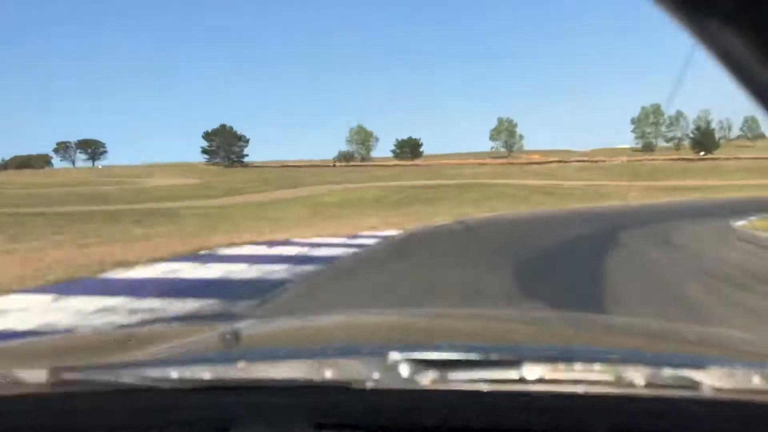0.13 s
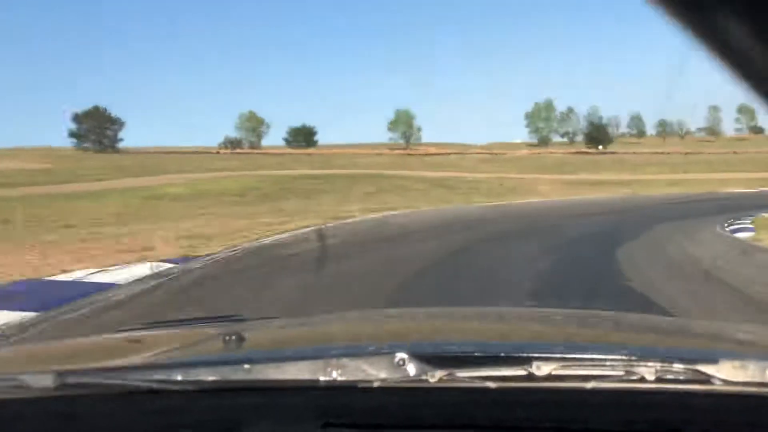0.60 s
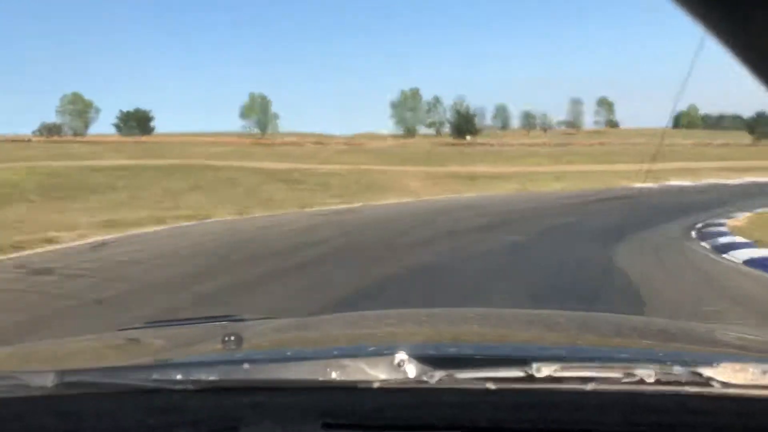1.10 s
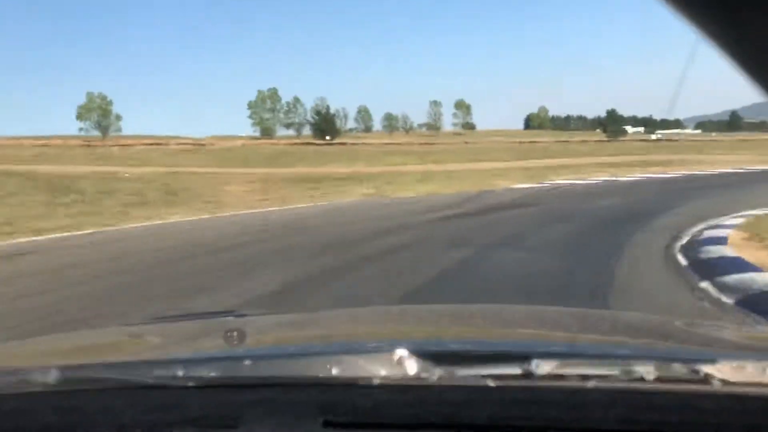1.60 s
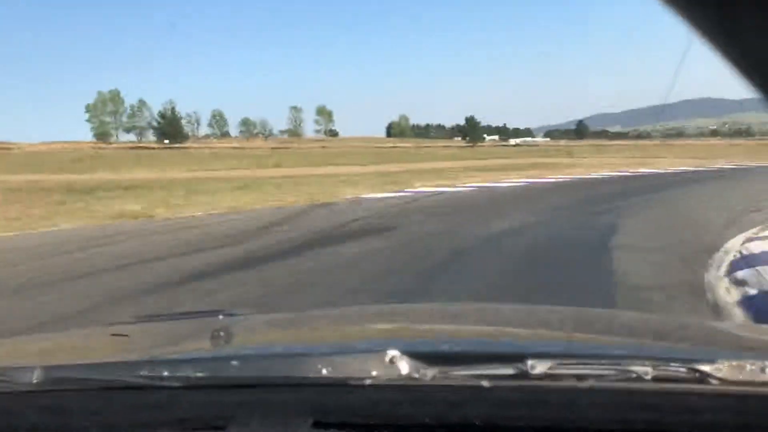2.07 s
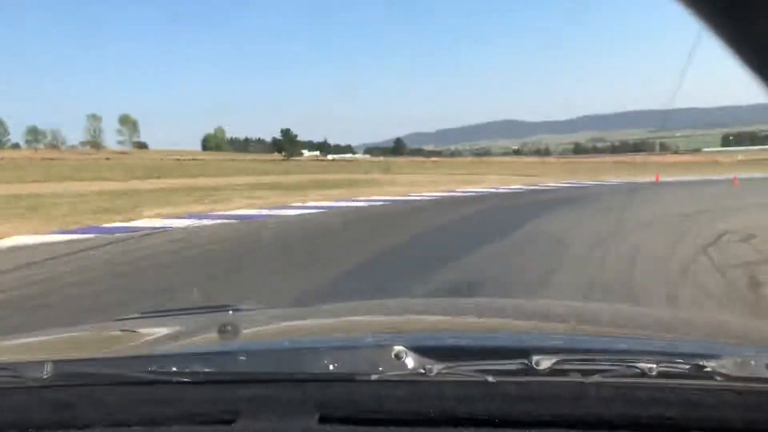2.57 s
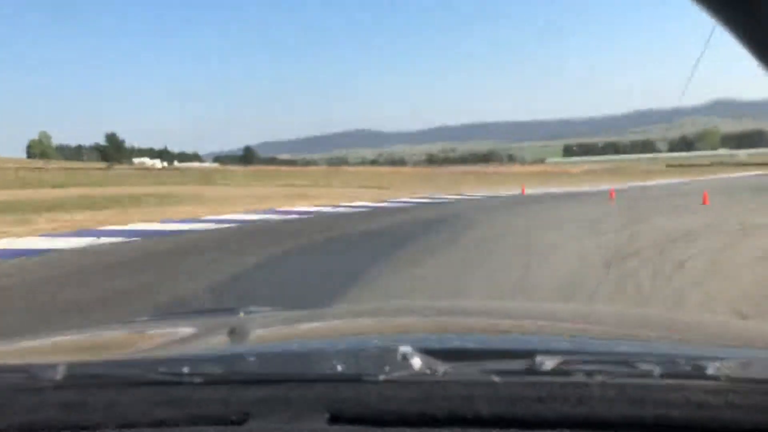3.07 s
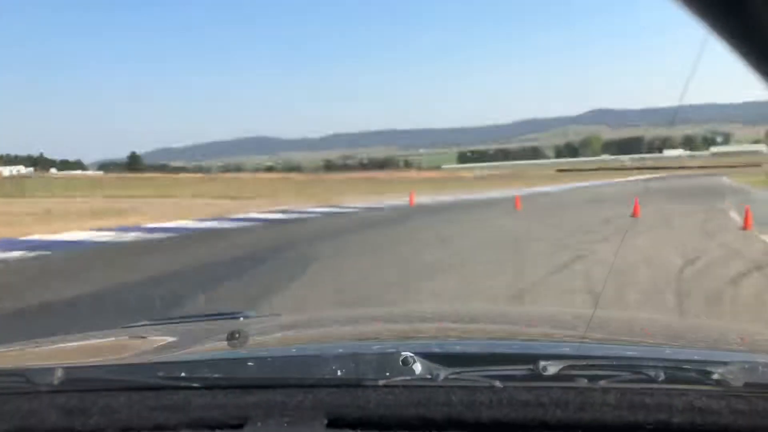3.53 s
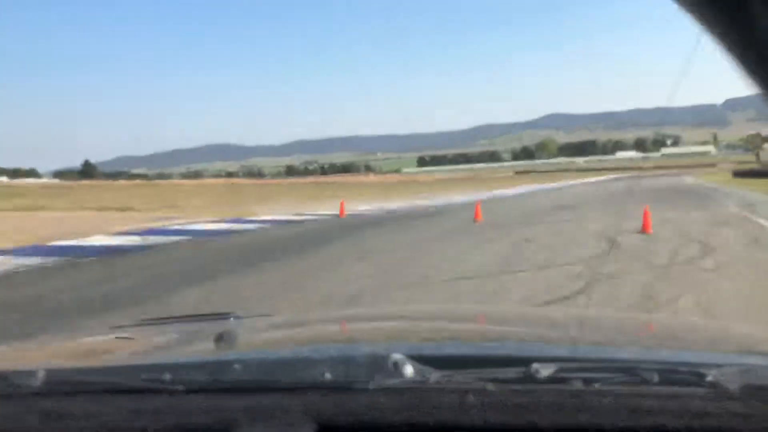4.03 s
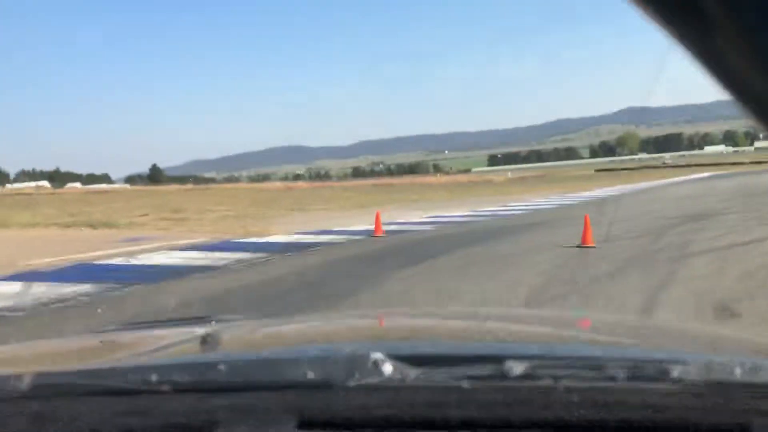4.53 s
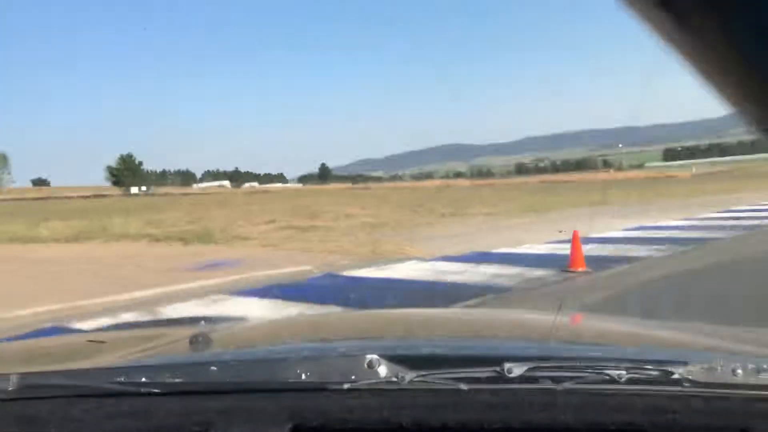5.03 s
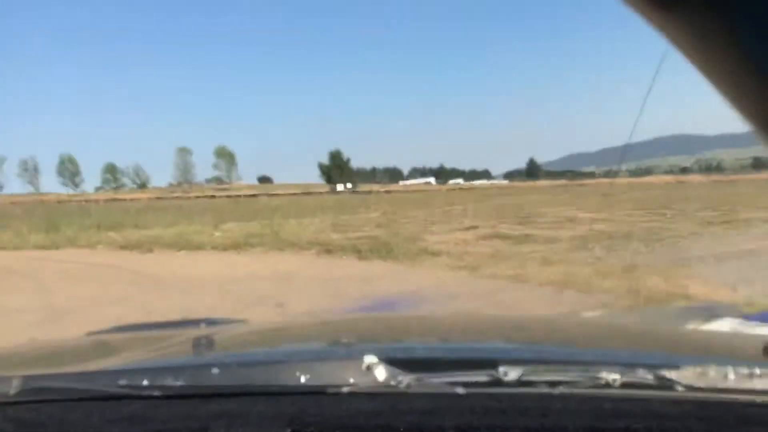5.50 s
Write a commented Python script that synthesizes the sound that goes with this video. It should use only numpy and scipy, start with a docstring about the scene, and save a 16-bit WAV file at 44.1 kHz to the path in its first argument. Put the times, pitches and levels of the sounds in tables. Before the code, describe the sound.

Car cabin on a circuit: engine drone sinking, one quick downshift blip, then sinking again, with rumbling tyres and a rattling camera mount.

```python
"""Inside a car slowing through corners: the engine's low orders, unsteady sines, hum over road roar of coloured
noise that the cabin booms with, and a metal clip jingles as each firing shakes it. Trim knocks, noise bursts
through panel resonances, come now and then from 0.7 s. From 1.9 s a loose camera mount buzzes in short bouts
of impulses and noise puffs, thickest after 3 s. At 3.7 s the engine is blipped for the downshift, then slows again."""
import sys
import numpy as np
from scipy import signal
from scipy.fft import rfft, irfft, next_fast_len
from scipy.io import wavfile
from scipy.ndimage import uniform_filter1d, map_coordinates

SR = 44100
rng = np.random.default_rng(int(sys.argv[2]) if len(sys.argv) > 2 else 0)


def inscribe(sig):
    """Save sig as 16-bit PCM at rate SR to the path in sys.argv[1].

    A 1-D sig is mono; a 2-D sig holds one channel per row.
    Samples are clipped to [-1, 1] before scaling.
    """
    pcm = np.round(np.clip(np.atleast_2d(sig).T, -1, 1) * 32767)
    wavfile.write(sys.argv[1], SR, pcm.astype(np.int16))


def rack_gain(trim_db):
    """Turn a fader trim in dB into the linear factor to multiply a signal by."""
    fader = np.asarray(trim_db, float)
    return 10 ** (fader / 20)


N = 248283

# engine speed, slowing on the brakes, blipped for the downshift, slowing again: t/s, nominal firing rate f/Hz
SPEED = [(0.0, 125.5), (0.45, 122), (1.0, 109.4), (1.4, 105.6), (1.8, 99.16), (2.25, 95.7), (2.75, 88.63),
         (3.05, 86.35), (3.3, 78.42), (3.55, 69.07), (3.72, 66), (3.97, 79), (4.14, 91.9), (4.24, 96.4),
         (4.45, 94.3), (4.6, 90.35), (5.05, 82.4), (5.33, 72.5), (5.63, 69.2)]
# body modes, which swell the hum and are rung by the road: f/Hz, width/Hz, level/dB
BODY = [(70.6, 6.2, 0.5), (84.7, 11.4, 2), (128.5, 2.7, 3.5)]


def unit(x):
    """Normalization: the signal scaled to rms 1."""
    return x / np.sqrt(np.mean(x ** 2) + 1e-20)


def curves(rows):
    """Linear interpolation: one value per sample for each column after the time."""
    s, *cols = np.transpose(rows)
    return [np.interp(np.arange(N) / SR, s, c) for c in cols]


def wobble(rate):
    """Slow random modulation: a smooth curve through random knots, rate of them a second (40 at most)."""
    knots = rng.standard_normal(int(N * 40 / SR) + 4)
    return map_coordinates(knots, [np.arange(N) * min(rate, 40) / SR])


def swells(times, sizes, width_s):
    """Superposition: bell-shaped swells of the given sizes, width_s being their standard deviation."""
    t = np.arange(0, N + 64, 64) / SR
    bells = np.exp(-.5 * ((t - np.asarray(times)[:, None]) / width_s) ** 2)
    return np.interp(np.arange(N) / SR, t, np.dot(sizes, bells))


def filtered(x, response):
    """Linear filtering: the spectrum of x times a complex response of frequency."""
    m = next_fast_len(N + SR // 2)
    return irfft(rfft(x, m) * response(np.fft.rfftfreq(m, 1 / SR)), m)[:N]


def colour(points):
    """Spectral shaping: gain through (f/Hz, level/dB) points on a log frequency axis."""
    f, db = np.transpose(points)
    return lambda hz: rack_gain(np.interp(np.log(hz + 1), np.log(f + 1), db, left=-120, right=-120))


def resonant(modes):
    """Modal superposition: causal second-order resonances (f/Hz, width/Hz, level/dB) of alternating sign."""
    def response(f):
        return sum((-1) ** k * rack_gain(db) * 1j * f * width / (centre ** 2 - f * f + 1j * f * width)
                   for k, (centre, width, db) in enumerate(modes))
    return response


def level_kept(x, response):
    """Power conservation: filters x and keeps its overall power."""
    return unit(filtered(x, response)) * np.sqrt(np.mean(x ** 2))


def patchy(response, patchy_db, size=512):
    """Non-stationary noise: rms 1, coloured, in patches of random gain; a longer frame draws them into strands."""
    z = signal.stft(rng.standard_normal(N), nperseg=size)[2]
    field = uniform_filter1d(rng.standard_normal(z.shape), size=3, axis=0)  # across frequency
    field = uniform_filter1d(field, size=7, axis=1)  # along time
    noise = signal.istft(z * rack_gain(patchy_db * unit(field)), nperseg=size)[1][:N]
    return unit(filtered(noise, response))


def puffs(times, db, t60, rise):
    """Exponential decay: noise bursts that swell over rise seconds and die away, each with its envelope's energy."""
    t = np.arange(SR // 20) / SR
    shape = rack_gain(db[:, None] - 60 * t / t60[:, None]) * (1 - np.exp(-t / rise))
    burst = shape * rng.standard_normal(shape.shape)
    burst *= np.linalg.norm(shape, axis=1, keepdims=True) / np.linalg.norm(burst, axis=1, keepdims=True)
    at = np.round(times * SR).astype(int)[:, None] + np.arange(len(t))
    return np.bincount(at.ravel(), burst.ravel(), N + SR)[:N]


def road():
    """Forced vibration: tyres and air shake the body, whose low noise swells and lulls; scrubbing tread sings."""
    # tyres and air: t/s, tyre roar level/dB, air rush level/dB
    road_levels = [(0.0, -27, -36), (0.5, -29.5, -36), (1.6, -30, -37), (2.7, -28, -36.5),
                   (3.4, -30.5, -39), (3.7, -27.5, -39), (4.08, -26, -36.5), (4.3, -29.5, -37),
                   (4.8, -26, -37.5), (5.1, -26.5, -36), (5.63, -26.5, -39)]
    # brief swells and lulls of the low noise: t/s, change of rumble, of floor-pan boom, of door drumming level/dB
    low_changes = [(0.0, 8.5, 0, 14), (0.299, 2, -7, -1), (0.8, -6, 10, -6), (1.0, 2, 10, -1),
                   (1.2, 4.5, -7, 0), (1.501, 1.5, 8.5, -9), (2.4, 4.5, 2, -5), (2.65, 6.5, 2, -27),
                   (2.95, 3, -1, 3.5), (3.16, -12, -1, -10), (3.32, -3, 8, 12), (3.47, -1, 12, 0),
                   (3.83, 1.5, -10, 5), (4.06, 5, 4.5, 17), (4.22, -2, -14, 0), (4.61, 4, -3, 9),
                   (4.78, -4, 13.5, 10.5), (5.04, 6, 8, 12), (5.22, 6, 14, 5), (5.54, 4, 1, 16.5)]
    # tread scrub: t/s, level/dB
    scrub_level = [(0.0, -45), (0.4, -44.5), (0.8, -49), (2.6, -54), (3.5, -59), (3.95, -45.5), (4.45, -52),
                   (4.58, -46), (4.7, -44.5), (5.0, -56), (5.12, -41.5), (5.25, -51), (5.63, -56)]
    # air leaking past the seals: t/s, level/dB
    hiss_level = [(0.0, -57), (0.5, -63.5), (0.9, -66), (2.0, -65), (2.6, -64), (3.1, -68.5), (3.7, -67),
                  (4.15, -60.5), (4.27, -59), (4.47, -57), (4.6, -60), (4.8, -64.5), (5.05, -66.5),
                  (5.63, -64.5)]
    # spectra of rumble, roar, air rush and leak hiss: f/Hz, relative level/dB per Hz
    rumble_colour = [(15, -30), (28, -13), (40, -5), (49, 0), (60, -5), (75, -9), (110, -13), (135, -15),
                     (180, -30), (300, -60)]
    roar_colour = [(110, -19.5), (180, -1.5), (292, -3.5), (344, -8.5), (399, -12), (442, -24),
                   (480, -27.5), (620, -29.5), (1060, -120)]
    rush_colour = [(260, -34), (450, -3.5), (680, 1), (754, -1.5), (938, -3.5), (1170, -8.5), (1830, -14),
                   (2380, -20.5), (5760, -37), (6310, -45), (7000, -39), (9100, -63.5), (15400, -120)]
    hiss_colour = [(2500, -32), (4000, 2), (6000, -1.5), (8000, -1.5), (11300, -9), (15000, -0.5),
                   (16000, -2.5)]
    # modes of floor pan, door skin and tread, each response squared below: f/Hz, width/Hz, relative level/dB
    pan = resonant([(149.3, 19, 0)])
    door = resonant([(413, 114, 0)])
    tread = resonant([(1280, 160, 4.5), (1687, 320, 1.5), (2220, 690, -6.5)])
    rumble_db, boom_db, drum_db, ring_db = -25.5, -30.5, -47.5, -28.5  # between the swells and lulls
    ring_follow = 0.67  # dB per dB of rumble change

    roar_db, rush_db = curves(road_levels)
    times, *changes = np.transpose(low_changes)
    rumble_change, boom_change, drum_change = [swells(times, change, width_s=0.041) for change in changes]
    rumble = rack_gain(rumble_db + rumble_change) * patchy(colour(rumble_colour), patchy_db=-4.5)
    boom = rack_gain(boom_db + boom_change) * patchy(lambda f: pan(f) ** 2, patchy_db=-0.7)
    roar = rack_gain(roar_db + 1.3 * wobble(8)) * patchy(colour(roar_colour), patchy_db=-1.3)
    drum = rack_gain(drum_db + drum_change) * patchy(lambda f: door(f) ** 2, patchy_db=5.0)
    rush = rack_gain(rush_db + 0.38 * wobble(8)) * patchy(colour(rush_colour), patchy_db=1.76, size=2048)
    scrub_gain = rack_gain(curves(scrub_level)[0] + 1.8 * wobble(6))
    scrub = scrub_gain * patchy(lambda f: tread(f) ** 2, patchy_db=2.4, size=1024)
    hiss = rack_gain(curves(hiss_level)[0]) * patchy(colour(hiss_colour), patchy_db=2)
    ring = rack_gain(ring_db + ring_follow * rumble_change) * patchy(resonant(BODY), patchy_db=-2.0)
    return rumble + ring + boom + roar + drum + rush + scrub + hiss


def trim():
    """Impact excitation: each plastic knock is a bright scrape, with two panel resonances answering."""
    # trim knocks: t/s, scrape level/dB, large panel level/dB
    knocks = [(0.681, -44, -46), (0.707, -45, -38), (0.796, -43, -57.5), (0.866, -43, -42),
              (1.014, -40.5, -38), (1.422, -39, -40), (1.737, -55.5, -43.5), (1.9, -40.5, -43.5),
              (1.979, -43, -48), (2.05, -44.5, -50), (2.44, -44, -47), (2.468, -40, -47.5),
              (2.7, -41.5, -47), (2.735, -44.5, -39), (2.883, -38.5, -50), (2.911, -41, -38.5),
              (3.715, -39.5, -33.5), (3.744, -47.5, -51), (3.782, -46, -43.5), (3.806, -45, -48),
              (3.833, -42, -49), (3.884, -35, -27), (4.563, -44, -30), (4.619, -42, -41),
              (4.646, -51.5, -40), (4.746, -50, -38.5), (4.798, -42, -35), (4.902, -40.5, -36.5),
              (5.173, -51, -39.5), (5.508, -39, -36.5), (5.529, -35, -30.5), (5.578, -49.5, -32),
              (5.606, -46, -36)]
    # a large and a small panel, a list of modes each, responses squared below: f/Hz, width/Hz, relative level/dB
    panels = [
        [(1327, 150, 3), (1980, 530, 0.5)],
        [(2520, 200, 3), (3780, 1100, 2.5)],
    ]
    # scrape resonances: f/Hz, width/Hz, relative level/dB
    scrape_modes = [(4900, 1800, 3), (7700, 1300, 4.5), (10300, 7600, -2), (14700, 1500, -14)]

    times, scrape_db, large_db = np.transpose(knocks)
    chance = rng.standard_normal((len(times), 2))
    t60 = np.clip(0.044 * (1 + .15 * chance[:, 0]), .005, .1)  # s
    small_db = (large_db + scrape_db) / 2 - 1.5 + 3.2 * chance[:, 1]
    large, small = resonant(panels[0]), resonant(panels[1])
    scrape = level_kept(puffs(times, scrape_db, t60, rise=0.0018), resonant(scrape_modes))
    large_knock = level_kept(puffs(times, large_db, 1.14 * t60, rise=0.0023), lambda f: large(f) ** 2)
    small_knock = level_kept(puffs(times, small_db, t60, rise=0.0031), lambda f: small(f) ** 2)
    return scrape + large_knock + small_knock


def clip_jingle():
    """Periodic excitation of modes: each firing shakes a metal clip, harder or softer by chance, in clumps."""
    jingle_level = [(0.0, -58), (0.3, -57), (0.6, -69), (0.9, -59), (1.5, -62), (1.95, -55.5),
                    (2.15, -62.5), (2.5, -63.5), (2.9, -57.5), (3.15, -66.5), (3.55, -66), (3.7, -52),
                    (4.0, -57.5), (4.13, -53), (4.22, -62), (4.28, -52.5), (4.45, -50), (4.5, -58),
                    (4.65, -52.5), (4.82, -50), (5.0, -56.5), (5.4, -71.5), (5.63, -57)]
    clip_modes = [(2880, 220, 8.5), (3750, 340, 5), (5340, 1200, 3), (7640, 400, 4), (9530, 900, -1.5),
                  (12700, 700, 0.5), (15300, 900, -0.5)]
    # lift of the three top modes: t/s, level/dB
    shimmer = [(0.0, 1.5), (4.2, -0.5), (4.27, 3), (4.46, 2.5), (4.52, -3), (5.63, 3.5)]

    firing_hz = curves(SPEED)[0]
    at = np.flatnonzero(np.diff(np.floor(np.cumsum(firing_hz) / SR)))  # one sample index per firing
    chance = rng.standard_normal((len(at), 2))
    times = np.abs(at / SR + .0006 * chance[:, 1])
    hit_db = 3 * chance[:, 0] + 1.6 * wobble(30)[at]
    hits = puffs(times, hit_db, np.full(len(at), .018), rise=.0007)
    low = filtered(hits, resonant(clip_modes[:-3]))
    top = filtered(hits, resonant(clip_modes[-3:]))
    level = rack_gain(curves(jingle_level)[0] + 4.3 * wobble(4.4))
    return level * unit(low + rack_gain(curves(shimmer)[0]) * top)


def mount():
    """Repeated impact: the mount taps its stop a few times per bout; cracks grow faster in level than taps."""
    # buzz bouts: t/s, contacts, spacing/ms, strength level/dB, change from first to last contact level/dB
    bouts = [(1.9422, 3, 12.55, -34, 10), (2.497, 1, 11.5, -27, 1.5), (2.7362, 2, 6.9, -39, -13),
             (2.9581, 3, 10.9, -29.5, 3), (3.0021, 2, 9.9, -24, -5.5), (3.0493, 5, 11.45, -28.5, -2),
             (3.1083, 4, 11.67, -27.5, 10.5), (3.1688, 6, 11.7, -31, 0), (3.2523, 6, 12.9, -32.5, -2),
             (3.3438, 3, 12.7, -37.5, 6), (3.4218, 1, 11.5, -35, 0), (3.7125, 3, 9.5, -36.5, 0),
             (3.802, 3, 11.7, -30, 6), (3.8657, 2, 13.1, -29, -7), (3.8853, 1, 11.5, -28, -3.5),
             (3.889, 5, 14, -29.5, 4), (3.953, 1, 11.5, -32, 1), (3.9776, 1, 11.5, -24.5, -2),
             (3.9902, 4, 12.15, -30, 7), (4.0365, 2, 13.5, -29.5, -20), (4.0735, 4, 10.6, -25.5, -6),
             (4.1278, 1, 13, -25, 0), (4.1415, 3, 11, -35, -1), (4.2148, 1, 11.5, -31.5, 0),
             (4.5505, 2, 11.05, -31, -5), (4.6812, 3, 11.45, -31.5, -3), (4.7271, 2, 11.5, -28.5, -4.5),
             (4.7699, 5, 10.9, -24.5, -6.5), (4.8264, 4, 12, -24.5, -4.5), (4.8858, 5, 12.33, -27.5, -3.5),
             (4.9495, 2, 9.1, -37, 10), (4.9951, 5, 11.68, -25.5, 6.5), (5.053, 4, 11.8, -28, -7.5),
             (5.2761, 4, 12.3, -31.5, -6), (5.3457, 3, 11.7, -31, 1.5), (5.4295, 1, 11.5, -28, -3),
             (5.4989, 3, 12.4, -32, 8), (5.5869, 1, 11.5, -22, -1.5)]
    # spectra of a light contact and of the crack added to it: f/Hz, relative level/dB per Hz
    tap_colour = [(2500, -44), (3800, -15.5), (4600, -10.5), (5300, -1), (6200, 0.5), (8300, -2),
                  (10200, -13), (12500, -17.5), (15500, -23.5), (16200, -47.5)]
    crack_colour = [(2000, -43), (3200, -9), (4300, -18), (6000, -20.5), (10000, -15), (13000, -7),
                    (14500, 0.5), (16000, -5.5), (16800, -24), (17000, -64.5)]
    # how much the taps crack over their size: t/s, level/dB
    cracking = [(0.0, 4), (3.3, 4), (3.7, -1), (4.1, 2), (4.7, 0.5), (5.63, 0.5)]
    arch_db, alternate_db = 3, 2.5  # a bout's outer contacts fall short; every second contact is harder

    times, db = [], []
    for start, contacts, spacing_ms, strength_db, change_db in bouts:
        k = np.arange(round(contacts))
        place = k / max(k[-1], 1) - .5  # -0.5 at the first contact, 0.5 at the last
        times.append(start + k * spacing_ms / 1000)
        db.append(strength_db + change_db * place - arch_db * (2 * place) ** 2 + alternate_db * (k % 2))
    times, db = np.concatenate(times), np.concatenate(db)
    chance = rng.standard_normal((len(times), 4))
    times = times + 0.00038 * chance[:, 0]
    db = db + 1.1 * chance[:, 1]
    each = np.ones(len(db))

    hit = np.round((times + 0.00032) * SR).astype(int)
    rebound_s = .0003 + .00025 * np.abs(chance[:, 2])
    rebound = hit + np.round(rebound_s * SR).astype(int)  # the stop is touched twice

    def blows(blow_db):
        """Impulse pair: a hit and a rebound of opposite sign."""
        strengths = np.r_[rack_gain(blow_db), -.6 * rack_gain(blow_db + 2.5 * chance[:, 3])]
        return np.bincount(np.r_[hit, rebound], strengths, N)

    tap = blows(db + 7.5) + puffs(times, db + 5.5, 0.0031 * each, rise=0.00048)
    tap = tap + puffs(times, db - 13, 0.009 * each, rise=.0003)  # a fainter, longer tail
    extra_db = np.interp(times, *np.transpose(cracking))
    crack = blows(1.59 * db + 17 + extra_db)
    crack = crack + puffs(times, 1.75 * db + 19.5 + extra_db, 0.0033 * each, rise=0.00047)
    return level_kept(tap, colour(tap_colour)) + level_kept(crack, colour(crack_colour))


def engine():
    """Order synthesis: shaft orders are unsteady sines; body modes swell the firing order as it passes them."""
    # firing order away from the body modes: t/s, level/dB
    load = [(0.0, -19.5), (0.3, -13), (0.8, -19.5), (1.6, -19.5), (2.4, -18.5), (2.75, -17.5), (2.95, -14),
            (3.4, -21.5), (3.62, -14.5), (3.95, -22.5), (4.15, -15), (4.45, -21.5), (4.72, -24),
            (4.85, -15), (5.1, -11), (5.2, -13.5), (5.63, -20.5)]
    # three-quarter order: t/s, level/dB
    under = [(0.0, -30), (0.5, -22), (2.3, -27), (2.9, -31), (3.6, -38), (3.9, -21), (4.25, -26.5),
             (4.6, -18.5), (5.2, -22), (5.4, -23), (5.63, -41)]
    # weaker orders, before the cabin: multiple of the firing rate, level/dB
    upper = [(.5, -36), (1.25, -42), (1.5, -34.5), (1.75, -40), (2, -34.5), (3, -35)]
    # cabin resonances that lift a weaker order passing through: f/Hz, width/Hz, level/dB
    cabin = [(59.4, 81, -5), (149, 32, 7.5), (198.7, 74, 1), (294.4, 44, 2)]
    # moments when the hum drops out briefly: t/s, depth level/dB
    dips = [(2.79, 4.5), (3.27, 22), (3.41, 4), (3.71, 17.5), (3.89, 1.5), (3.98, 8), (4.33, 4), (4.58, 22),
            (4.92, 6), (5.24, 11), (5.44, 5)]
    weak_follow = 0.36  # dB of the weaker orders per dB of the firing order

    firing_hz, firing_db, under_db = curves(SPEED)[0], curves(load)[0], curves(under)[0]
    phase = 2 * np.pi * np.cumsum(firing_hz) / SR
    body_db = sum(db / (1 + ((firing_hz - mode_hz) / width) ** 2) for mode_hz, width, db in BODY)
    firing_db = firing_db + body_db - swells(*np.transpose(dips), width_s=0.013)

    def order(multiple, db):
        """Phase modulation: a sine of rms level db whose phase wanders."""
        wander = 0.077 * wobble(22) + 2 * np.pi * rng.random()
        return np.sqrt(2) * rack_gain(db) * np.sin(multiple * phase + wander)

    follow_db = weak_follow * (firing_db - firing_db.mean())
    weak = sum(order(multiple, db + follow_db + 2.73 * wobble(5.4)) for multiple, db in upper)
    firing = order(0.99, firing_db + 1.72 * wobble(14))  # just below the nominal rate
    three_quarter = order(3 / 4, under_db + 2.0 * wobble(6))
    return firing + three_quarter + filtered(weak, resonant(cabin))


def scene():
    """Superposition: engine, mount buzz, and the road, clip and trim sounds kept below 15850 Hz."""
    top_hz = 15850
    band_limited = filtered(road() + clip_jingle() + trim(), lambda hz: hz < top_hz)
    return (engine() + band_limited + mount())[None]


def roll_off(x):
    """The treble ends steeply here."""
    return signal.sosfilt(signal.butter(12, 16990, fs=SR, output="sos"), x)


def record(dry):
    """Signal chain: the superposed sources are stored by the camera."""
    return roll_off(dry)


dry = scene()
out = record(dry)
inscribe(out)
```